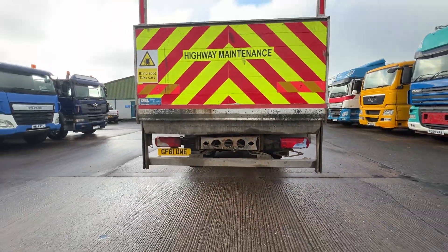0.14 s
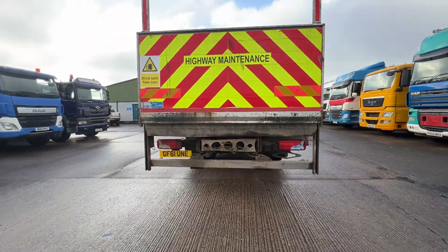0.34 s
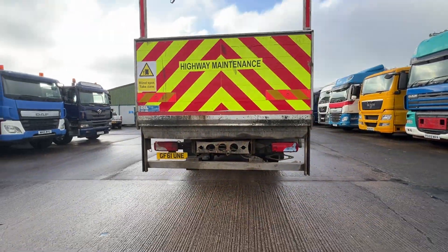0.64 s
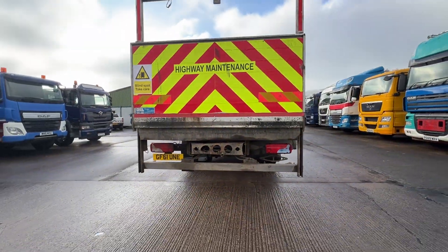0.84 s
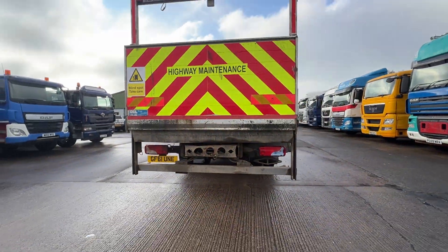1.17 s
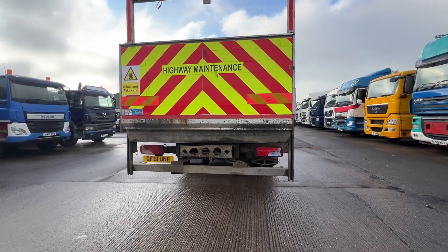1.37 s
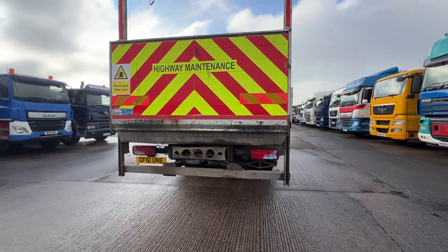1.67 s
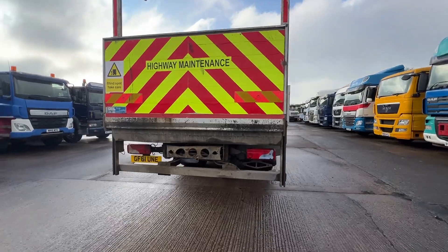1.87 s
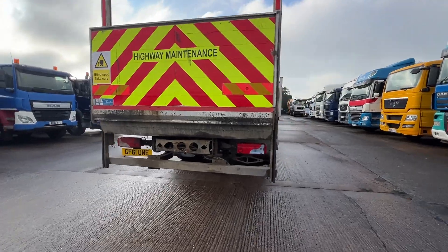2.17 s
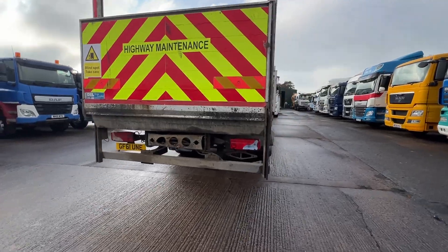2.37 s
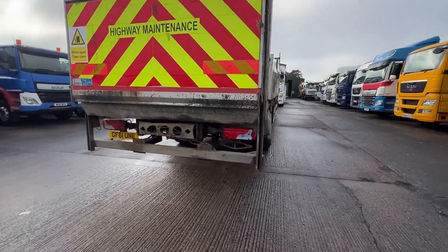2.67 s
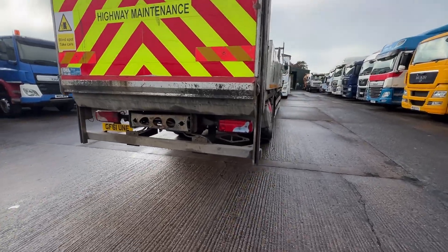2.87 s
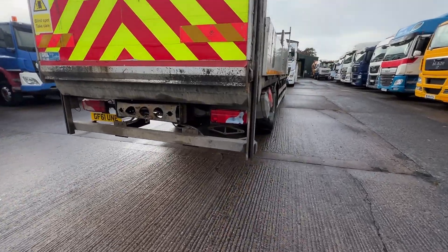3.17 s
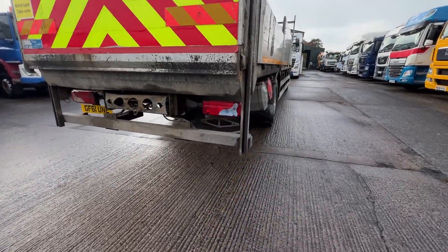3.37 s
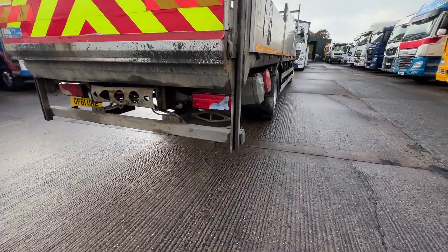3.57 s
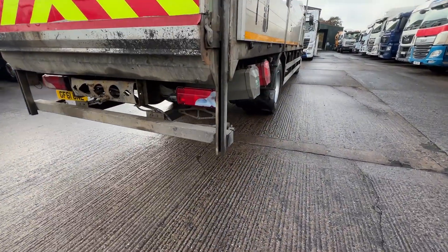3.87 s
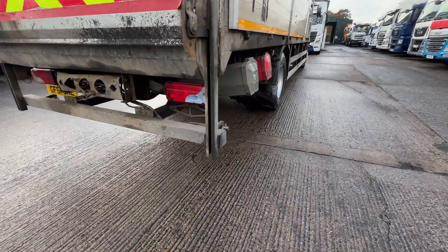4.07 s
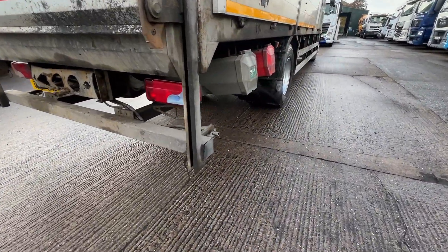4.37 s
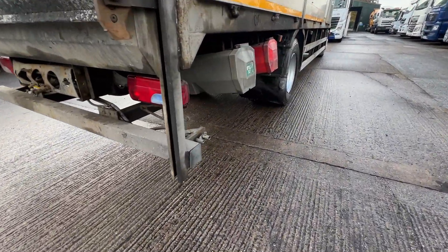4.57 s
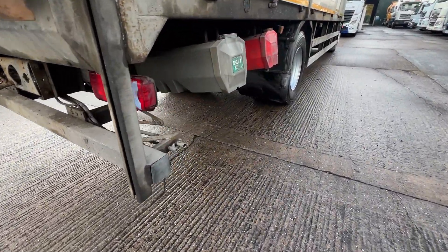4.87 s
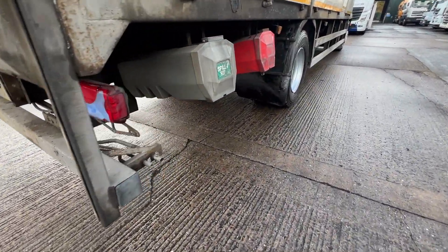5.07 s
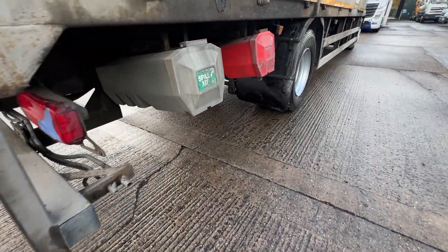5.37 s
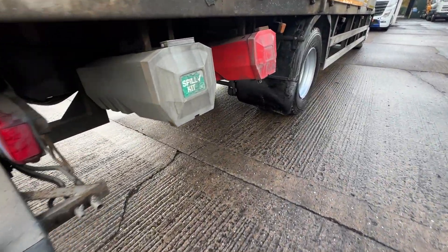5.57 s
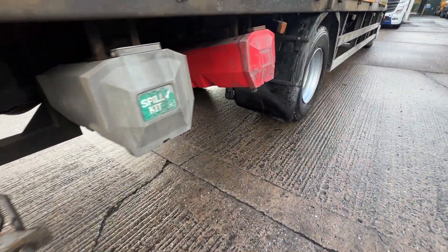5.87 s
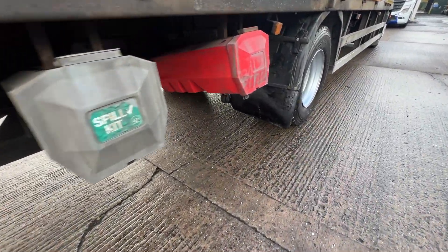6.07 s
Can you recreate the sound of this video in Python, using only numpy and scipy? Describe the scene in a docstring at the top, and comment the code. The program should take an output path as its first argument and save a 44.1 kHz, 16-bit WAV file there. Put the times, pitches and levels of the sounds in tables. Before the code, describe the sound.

Outdoors, a diesel truck idles without a break, heard through a handheld phone carried from behind it round to its side. Its low hum and rumble carry a fast knocking rattle, a regular valve clack and a soft fluttering hiss. Grit ticks now and then underfoot and loose metal pings faintly. From about halfway the hum swells and the hiss becomes clearer, while the engine speed stays the same.

```python
"""Lorry idling in a concrete yard

A six-cylinder diesel, heard on a phone's two microphones carried from the tail up along its side.
The exhaust hums on the firing orders, the block clatters cylinder by cylinder, a loose valve clacks
and the air compressor pants. Grit ticks underfoot and loose metal pings.
Each microphone port colours the sound differently."""
import sys
import numpy as np
from scipy.fft import rfft, irfft, next_fast_len
from scipy.io import wavfile
from scipy.ndimage import map_coordinates

SR = 44100
rng = np.random.default_rng(int(sys.argv[2]) if len(sys.argv) > 2 else 0)


def generate_wav(signal):
    """Clip the signal to [-1, 1] and save it as 16-bit WAV at the path in sys.argv[1]."""
    frames = np.transpose(np.atleast_2d(signal))
    scaled = np.clip(frames, -1, 1) * 32767
    pcm = np.round(scaled).astype(np.int16)
    wavfile.write(sys.argv[1], SR, pcm)


N = 274743
TIME = np.arange(N) / SR
CYCLE_HZ = 5.008  # one engine cycle is two turns of the crank

# Exhaust tones: multiple of the cycle rate (multiples of six lie on the firing beat)
EXHAUST_ORDERS = [6, 9, 12, 14, 15, 21, 33, 18, 22, 24, 25, 39, 27, 28, 29, 30, 36, 42, 48, 54, 60, 66, 72]
# Each tone within the hum, by microphone position: behind_db, corner_db, beside_db
ORDER_LEVELS = [(-14, -19, -16), (-49, -43, -39), (4.5, 2, 7.5), (-16, -17, -20), (-14, -28, -23),
                (-38, -16, -40), (-33, -26, -49), (-22, -26, -24), (-9, -39, -28), (-4.5, -12, -15),
                (-30, -11.5, -53), (-27, -24, -33), (-38, -30, -23), (-15, -25, -31), (-14.5, -16, -38),
                (-32, -31, -12), (-15.5, -12, -19), (-9, -15.5, -28.5), (-28, -21.5, -22),
                (-15.5, -31, -27), (-24.5, -30, -61), (-27, -25, -29), (-27, -33.5, -29)]
# Spectrum of the rumble under the tones: frequency_hz, level_db
RUMBLE_SPECTRUM = [(24, -48), (31, -10), (40, -5), (50, -12.5), (78, 1), (100, -9.5), (120, -2.5),
                   (145, 0.5), (190, -7.5), (230, -7), (270, -11.5), (340, -17.5), (410, -30), (700, -50.5)]
def exhaust():
    """Firing pulses hum over a rumble; tones off the beat of every second firing waver more."""
    silencer_hz = 100  # tones above this resonance leave the silencer inverted
    angle = 2 * np.pi * CYCLE_HZ * (TIME - .0047)
    tones = 0
    for order, place_db in zip(EXHAUST_ORDERS, ORDER_LEVELS):
        waver = .004 * order + .35 * (order % 3 > 0)
        level_db = by_place(*place_db) + 4 * waver * wobble(2)
        polarity = np.sign(silencer_hz - order * CYCLE_HZ)
        tones += amp(level_db) * polarity * np.cos(order * angle + 1.2 * waver * wobble(2))
    hum = np.sqrt(2) * amp(walk("hum_db")) * tones
    return hum + amp(walk("rumble_db") + .67 * wobble(3.72)) * rush(RUMBLE_SPECTRUM)


# Block resonances: pitch_hz, width_hz, behind_db, corner_db, beside_db, mic_correlation, delay_ms,
# strike_db (over the rattle), rattle_t60_s, then blow_db for each of the six cylinders
BLOCK_MODES = [(308.4, 96, -13.5, -13.5, -17, 0.9, 5, 5.8, 0.33, 3.9, -0.5, -1, -3, -3, 6.5),
               (622, 136, -11, -23.5, -12.5, 0.2, 4.68, 19, 0.24, 5.8, -2, -1.5, -7, 3.5, -8),
               (776, 90, -7, -22.5, -13, 0.54, 5.14, 32, 0.09, 2.9, 2.5, 2.5, -2.5, 5.5, 3),
               (826, 85, -10, -20.5, -17, 0.59, 5.06, 32, 0.09, 2.2, 4.5, 5, -3.5, 7, 2),
               (990, 73, -13.5, -8.5, -6, 0.45, 4.09, 25.4, 0.3, 5.2, 4.5, 1.5, 1.5, 10.5, 1.5),
               (1057.4, 33, -23.5, -11.5, -15.5, 0.4, 4.2, 10, 0.85, 6.3, -3, 4, 10.5, 4, 12),
               (1124.6, 52, -14, -9.5, -10, 0.27, 4.18, 12, 0.13, 5.8, 2, 2, -4, 5, 3),
               (1167, 47, -8, -11.5, -8, 0.66, 4.09, 24.5, 0.29, 2.9, -6, -1.5, -14, -7, -2.5),
               (1243, 51, -9, -17, -23, 0.24, 1.7, 13, 0.46, 1.5, -2, -13, 2, 3, -4),
               (1417, 82, -24, -13, -16, .3, 5.1, 22, 0.17, 3, 7, 5, 0, 3, -7),
               (1797, 110, -19.5, -22, -16, 0.44, 6, 23, 0.34, 5.2, 4, 1.5, 2, 4.5, -2),
               (1795, 480, -11.5, -14, -8.5, 0.59, 12, 17, 0.46, 6, -13, 5, 5, 5.5, -12),
               (2070, 330, -18, -22.5, -19, 0.54, 8.7, 15, 0.28, 12, -19, -11, 11.5, 2, -16),
               (2595, 610, -22, -23.5, -20.5, 0.15, 5, 16, 0.34, 11.3, -16, -1, -20, 11.5, 1),
               (3330, 290, -30, -27, -35, 0.46, 7.4, 12, 0.13, 13, -7, -11, -15, 10, -6),
               (4200, 920, -21, -23, -26, 0.41, 5.9, 16, 0.28, 12.4, 6, 7, 3, 11.5, -11),
               (5970, 1000, -40, -34, -21, 0.55, 6, 14, 0.12, 13, 5, -4, -11, 11, -4),
               (9230, 2500, -34, -31, -34, .6, 7.6, 8, 0.12, 10, -5, -4, -10, 8, -6)]
def block():
    """Each firing strikes the block and leaves a dying rattle; each mode weights the cylinders its own way."""
    beat_s = 1 / (6 * CYCLE_HZ)
    total = round(N / SR / beat_s) + 12
    burn_db = 1.1 * rng.standard_normal(total)  # no two firings burn alike
    jitter = (SR * .00025 * (rng.random(total) - 1)).astype(int)  # ignition delay varies
    pattern = cycle_noise()
    knocks = 0
    for row in BLOCK_MODES:
        hz, width_hz, *place_db, correlation, delay_ms, strike_db, t60_s = row[:9]
        firings = (TIME - delay_ms / 1000) / beat_s + 6
        firing, age_s = firings.astype(int), firings % 1 * beat_s
        blows = amp(np.resize(row[9:], total) + burn_db + .8 * rng.standard_normal(total))
        # the previous rattle still dies under the new one
        tail = blows[firing - 1] * amp(-60 * beat_s / t60_s)
        rattle = np.hypot(blows[firing], tail) * amp(-60 * age_s / t60_s)
        mid, side = mid_side(correlation)
        repeat = along(CYCLE_SHARE, hz)
        noise = np.sqrt(1 - repeat) * rng.standard_normal((2, N)) + np.sqrt(repeat) * pattern
        force = rattle * ([[mid, side], [mid, -side]] @ noise)
        starts = np.flatnonzero(np.diff(firing)) + 1
        force[:, starts + jitter[firing[starts]]] += amp(strike_db) * blows[firing[starts]]
        ring = unit(filtered(force, lambda f: resonance(f, hz, width_hz)))
        knocks += amp(by_place(*place_db) + swell_db(hz)) * ring
    return knocks


# Gaps under the lorry's body: pitch_hz, middle_s, half_length_s (at half height), boost_db
BODY_GAPS = [(758, 2.79, 0.49, 6.5), (1161, 3.04, 0.28, 6.5), (992.7, 3.45, 0.16, 3),
             (758, 4.53, 0.21, 10.5), (1120, 4.72, 0.3, 5), (994, 5.2, .25, 3), (310, 2.7, 0.33, 6),
             (1122, 3.55, 0.1, 2), (1058, 3, 0.29, 8), (1820, 1.3, .3, 5), (1810, 4.9, 0.27, 4)]
def swell_db(mode_hz):
    """A block resonance stands out as the microphones pass a gap, and drifts slowly by chance."""
    boost_db = 0
    for hz, middle_s, half_s, db in BODY_GAPS:
        nearest_hz = min((row[0] for row in BLOCK_MODES), key=lambda f: abs(f - hz))
        if nearest_hz == mode_hz:
            boost_db += db * np.clip(1 - abs(TIME - middle_s) / half_s / 2, 0, 1)
    return boost_db + wobble(2.42)


# Gears, fan and belts from behind the lorry: frequency_hz, level_db
WHIRR_BEHIND = [(300, -42), (400, -21), (480, -7.5), (700, -2.5), (1200, -3.5), (1600, -6), (2100, -12.5),
                (2500, -15.5), (4500, -19.5), (6000, -20.5), (7100, -27.5), (9000, -31), (11700, -39),
                (16000, -70)]
# The same from beside it: frequency_hz, level_db
WHIRR_BESIDE = [(250, -3), (350, -0.5), (520, -3), (900, -3), (1300, -2), (1800, -7.5), (2300, -13),
                (5000, -23), (6000, -27), (7100, -24.5), (9000, -30), (11700, -30), (16000, -60)]
def gears_and_fan():
    """Gears, fan and belts make a broad noise whose colour changes as the microphones come round."""
    near = by_place(0, .68, 1)
    whirr = np.sqrt(1 - near) * rush(WHIRR_BEHIND) + np.sqrt(near) * rush(WHIRR_BESIDE)
    return amp(-2 + .6 * wobble(5)) * whirr


# Valve cover modes, from the tail and from the side: pitch_hz, far_db, near_db, t60_s
COVER_MODES = [(1128, -6, 3, 0.044), (1302, -3, -3, 0.052), (1280, -9, -10, 0.07), (1387, 5, 4, 0.059),
               (1424, -22, 6, 0.09), (1500, -18, -1, 0.051)]
# The valve landing and bouncing on its seat: delay_s, level_db
VALVE_BOUNCES = [(0, 7), (0.011, 2.5), (.022, 2)]
# One clack a cycle, harder or softer: start_s, strength_db
VALVE_CLACKS = [(0.0024, -36), (0.2016, -37), (0.402, -40), (0.602, -37), (0.801, -37), (1.0017, -36),
                (1.201, -36.5), (1.4017, -39), (1.603, -42), (1.8008, -46), (2.0064, -42), (2.1989, -47),
                (2.4, -43), (2.598, -48), (2.799, -46), (2.9991, -48), (3.197, -40), (3.3965, -40),
                (3.597, -43), (3.7976, -39.5), (3.9972, -38.5), (4.197, -37), (4.3959, -39), (4.5955, -40),
                (4.795, -45), (4.996, -44), (5.1944, -47), (5.3946, -41), (5.5943, -38), (5.7922, -41),
                (5.993, -40), (6.1953, -36)]
def loose_valve():
    """A loose valve seats and bounces, ringing its cover a little differently at every blow."""
    out, t = np.zeros((2, N + SR)), np.arange(SR // 8) / SR
    mic_delay_s, mic_db = [[.00026], [0]], [[-4], [0]]  # from the right: later and weaker on the left
    nearness = by_place(0, .76, .95)
    attack = 1 - np.exp(-t / .0008)
    for start_s, strength_db in VALVE_CLACKS:
        at = round(start_s * SR)
        for delay_s, bounce_db in VALVE_BOUNCES:
            ring = 0
            for hz, far_db, near_db, t60_s in COVER_MODES:
                mode_db = far_db + nearness[at] * (near_db - far_db) + rng.normal(0, 1.2, (2, 1))
                phase = 2 * np.pi * hz * (t - mic_delay_s) + rng.normal(0, .5, (2, 1))
                ring += amp(mode_db - 60 * t / t60_s) * np.sin(phase)
            add_at(out, start_s + delay_s, amp(strength_db + bounce_db - 12) * ring * attack)
    return amp(mic_db) * out[:, :N]


# Air through the compressor's valves: frequency_hz, level_db
AIR_SPECTRUM = [(2000, -22), (3000, 6), (4500, -0.5), (5200, 5), (5850, 8), (6400, 6.5), (7000, -2.5),
                (7800, 4), (8500, 4), (9200, 2), (10000, 3.5), (11000, 3.5), (13000, 8.5), (16000, 1)]
# Compressor tones: multiple of the stroke rate
STROKE_ORDERS = [4, 7, 9, 18]
# Each of those tones: level_db
STROKE_LEVELS = [-52, -68, -56, -58.5]
def compressor():
    """The gear-driven compressor hisses through its valves once a stroke, over a few low tones."""
    stroke_hz, top_edge_hz = 11.87, 11200
    steady_angle = 2 * np.pi * stroke_hz * TIME
    angle = 2 * np.pi * stroke_hz * (TIME + .02) + .35 * wobble(3.52)
    stroke_db = by_place(4.6, 2.9, 3.8) * np.cos(angle) - .5 * np.cos(2 * angle + .3)
    stroke_db += .96 * wobble(21) + wobble(3.98)
    air = rush(AIR_SPECTRUM)
    top = filtered(air, lambda hz: hz > top_edge_hz)
    top_db = by_place(-6, -1.4, 1.5) + .45 * stroke_db + 1.5 * wobble(8)  # the top pants deeper
    hiss = amp(walk("hiss_db") - 1.5 + stroke_db) * (air - top + amp(top_db) * top)
    tones = sum(amp(db + 3.1 * wobble(1.65)) * np.cos(order * steady_angle)
                for order, db in zip(STROKE_ORDERS, STROKE_LEVELS))
    return hiss + np.sqrt(2) * tones


# Grit on the concrete below the microphones: start_s, strength_db, crunch_db (against the tick),
# centre_hz, width_hz
GRIT_TICKS = [(0.216, -36, -15, 9000, 6000), (0.2304, -50, -10, 9000, 5000),
              (0.773, -31, -18, 11000, 22000), (1.3853, -38, -14, 9000, 12000),
              (2.0753, -44, -9, 9500, 6000), (2.0934, -41, -7, 9000, 5000), (3.315, -32, -14, 9000, 7000),
              (3.3273, -26, -18, 11000, 24000), (3.339, -40, -13, 9600, 9000),
              (3.352, -42, -10, 9600, 9000), (4.18, -46, -4, 9500, 5000), (4.2009, -31, -14, 9500, 9000),
              (4.227, -42, -12, 9000, 5000)]
def grit():
    """Small stones crack under the shoes: a bright tick and a short crunch."""
    out, t = np.zeros((2, N + SR)), np.arange(SR // 10) / SR
    f = np.fft.rfftfreq(len(t), 1 / SR)
    attack = 1 - np.exp(-t / .00081)
    for start_s, strength_db, crunch_db, hz, width_hz in GRIT_TICKS:
        envelope = attack * (amp(-60 * t / .0067) + amp(crunch_db - 60 * t / .087))
        noise = [[1, .84], [1, -.68]] @ rng.standard_normal((2, len(t)))
        band = resonance(f, hz, width_hz) * (f > 4500)
        add_at(out, start_s, amp(strength_db) * irfft(rfft(envelope * noise) * band, len(t)))
    return out[:, :N]


# Faint touches of metal: start_s, strength_db, pitch_hz
METAL_PINGS = [(0.8294, -52, 3280), (1.2244, -46, 4000), (1.3059, -47, 3780), (1.4097, -41, 3330),
               (1.5539, -47, 3330), (2.9612, -46, 3150), (2.9951, -46, 4400)]
def pings():
    """Loose metal touches lightly and rings on one note."""
    out, t = np.zeros((2, N + SR)), np.arange(SR // 8) / SR
    t60_s = .09
    envelope = amp(-7 - 60 * t / t60_s) * (1 - np.exp(-t / .0027))
    for start_s, strength_db, hz in METAL_PINGS:
        mic_phase = rng.normal(0, .36, (2, 1))
        add_at(out, start_s, amp(strength_db) * envelope * np.sin(2 * np.pi * hz * t + mic_phase))
    return out[:, :N]


# How alike the engine's noise is at the two microphones: frequency_hz, correlation
MIC_CORRELATION = [(60, 0.98), (130, .97), (220, 0.94), (350, 0.78), (500, 0.063), (750, 0.12),
                   (1300, 0.42), (2000, 0.048), (3500, 0.14), (6000, 0.16), (10000, 0.23)]
# The part of that noise that returns every cycle: frequency_hz, power_share
CYCLE_SHARE = [(60, .3), (150, .45), (300, .45), (600, .17), (800, .3), (1100, .3), (1900, .07), (3500, 0)]
def rush(spectrum):
    """Coloured engine noise of rms 1, alike at both microphones in the bass and partly repeating."""
    def response(hz):
        repeat = along(CYCLE_SHARE, hz)
        spread = mid_side(along(MIC_CORRELATION, hz))
        return amp(along(spectrum, hz)) * np.sqrt([[1 - repeat], [repeat]]) * spread
    fresh_and_repeating = np.array([rng.standard_normal((2, N)), cycle_noise()])
    mid, side = filtered(fresh_and_repeating, response).sum(axis=0)
    return unit(np.array([mid + side, mid - side]))


def cycle_noise(pattern_s=1.2):
    """Two white noises that come back each engine cycle while fading slowly into new patterns."""
    patterns = rng.standard_normal((2, int(N / SR / pattern_s) + 2, round(SR / CYCLE_HZ)))
    current, fade = (TIME / pattern_s).astype(int), TIME / pattern_s % 1 * np.pi / 2
    at = np.arange(N) % patterns.shape[-1]
    return np.cos(fade) * patterns[:, current, at] + np.sin(fade) * patterns[:, current + 1, at]


# The microphones' path: time_s, place (0 behind the lorry, 1 at its corner, 2 beside it),
# hum_db, rumble_db, clatter_db, hiss_db
MIC_PATH = [(0, 0.47, -43.5, -35.5, -46, -59.5), (.9, 0.061, -39.5, -36.5, -47, -60),
            (1.5, 0.07, -41.5, -36, -46.5, -59.5), (2.6, 0.36, -41, -38, -46.5, -60),
            (3.2, 0.62, -38, -36, -45.5, -58.5), (3.6, 1.08, -34.5, -37.5, -44.5, -56.5),
            (4.2, 1.3, -35, -37, -44.5, -54), (4.8, 1.36, -33, -37.5, -43, -52.5),
            (5.5, 1.91, -34.5, -37, -43, -51), (6.23, 1.6, -32.5, -34.5, -42, -49)]
def walk(name):
    """The place, or one source's gain, along the walk, sample by sample."""
    time_s, *curves = np.transpose(MIC_PATH)
    names = ["place", "hum_db", "rumble_db", "clatter_db", "hiss_db"]
    return np.interp(TIME, time_s, curves[names.index(name)])


def by_place(behind, corner, beside):
    """A value blended for where the microphones are at each moment."""
    return np.interp(walk("place"), [0, 1, 2], [behind, corner, beside])


def mid_side(correlation):
    """Mid and side gains that give this correlation between the microphones."""
    angle = np.arccos(correlation) / 2
    return np.cos(angle), np.sin(angle)


def resonance(f, hz, width_hz):
    """Response of two equal band-passes in series."""
    return (1j * f * width_hz / (hz * hz - f * f + 1j * f * width_hz)) ** 2


def filtered(x, response):
    """x through a complex response of frequency."""
    size = next_fast_len(N + SR // 4)
    return irfft(rfft(x, size) * response(np.fft.rfftfreq(size, 1 / SR)), size)[..., :N]


def wobble(rate):
    """A smooth random curve, rate knots a second."""
    coarse_s = np.arange(0, N / SR + .01, .005)
    knots = rng.standard_normal(int(N * rate / SR) + 4)
    return np.interp(TIME, coarse_s, map_coordinates(knots, [coarse_s * rate]))


def along(points, hz):
    """(frequency_hz, value) points read on a log axis."""
    f, values = np.transpose(points)
    return np.interp(np.log(hz + 1), np.log(f + 1), values)


def amp(db):
    """Decibels to gain."""
    return 10 ** (np.asarray(db) / 20)


def unit(x):
    """Scaled to rms 1."""
    return x / np.sqrt(np.mean(x ** 2) + 1e-20)


def add_at(out, start_s, sound):
    """Mix a short stereo sound into out."""
    out[:, round(start_s * SR):][:, :sound.shape[1]] += sound


def scene():
    """The lorry and the yard as they reach the two microphones."""
    tailpipe = exhaust()
    clatter = amp(walk("clatter_db")) * (block() + gears_and_fan())
    return tailpipe + clatter + loose_valve() + compressor() + grit() + pings()


# Colour of the left microphone port: frequency_hz, gain_db
LEFT_MIC = [(60, 1), (200, -1.5), (450, 3), (700, 1.5), (1000, 2.5), (3500, 5), (6000, 5), (7500, 0.5),
            (10000, -8.5), (11000, -13), (11800, -12.5), (13000, -20.5), (15700, -20)]
# Colour of the right microphone port: frequency_hz, gain_db
RIGHT_MIC = [(60, -3), (200, -6.5), (450, 7), (1000, 3.5), (3500, 4.5), (5000, -1), (7200, -0.5), (8300, 5),
             (10000, 6.5), (11000, -5.5), (11800, -16), (13000, -21.5), (15700, -15)]
# How far the left port leads, with the phone's body between the two: frequency_hz, lead_rad
LEFT_LEAD = [(20, 0), (150, 0.36), (430, -1.7), (560, -.5), (780, 0.04), (1050, -2), (1390, -3.5),
             (1800, -5.5), (2300, -6), (4200, -5.5), (5600, -9.5), (7000, -12.5), (16000, -9.5)]
def record(dry):
    """Each microphone port has its own colour and phase; nothing passes above the top of the band."""
    top_hz = 15700
    def ports(hz):
        colour = amp([along(LEFT_MIC, hz), along(RIGHT_MIC, hz)])
        phase = np.outer([.5, -.5], along(LEFT_LEAD, hz))
        return colour * np.exp(1j * phase) * (hz < top_hz)
    return filtered(dry, ports)


dry = scene()
out = record(dry)
generate_wav(out)
```